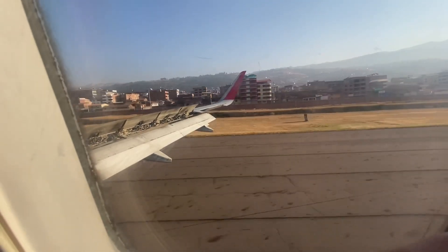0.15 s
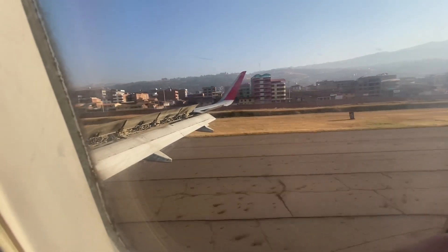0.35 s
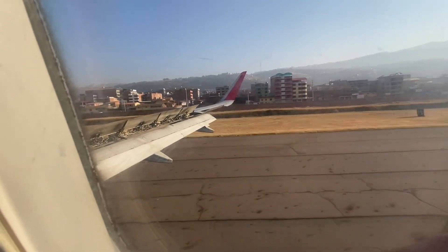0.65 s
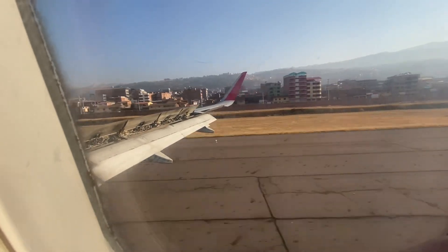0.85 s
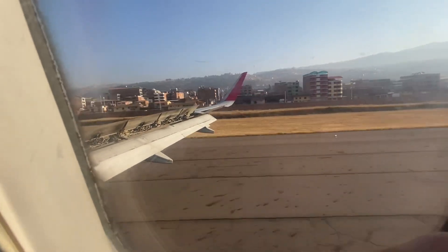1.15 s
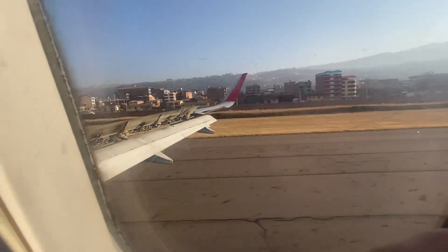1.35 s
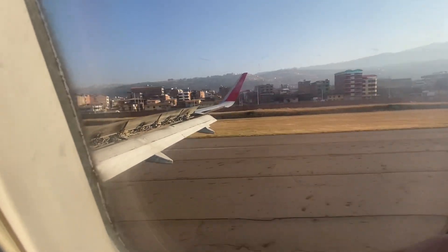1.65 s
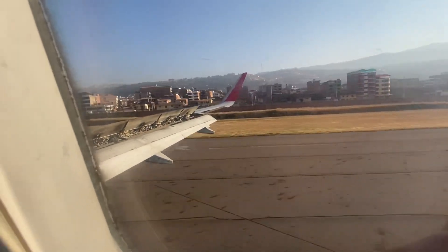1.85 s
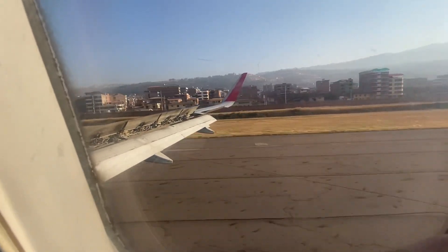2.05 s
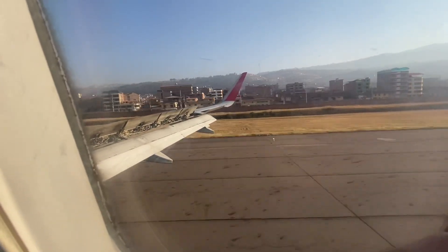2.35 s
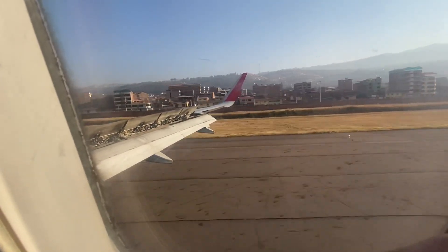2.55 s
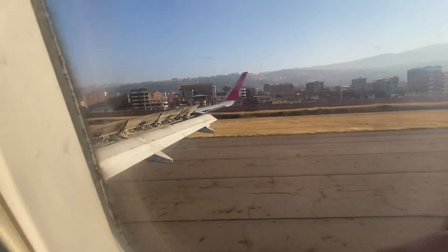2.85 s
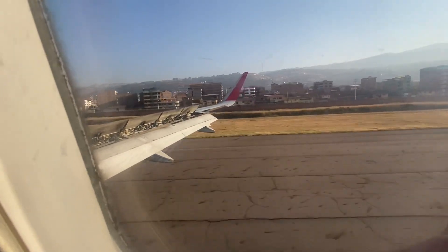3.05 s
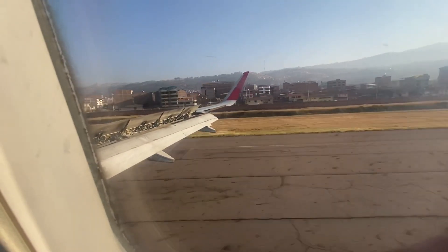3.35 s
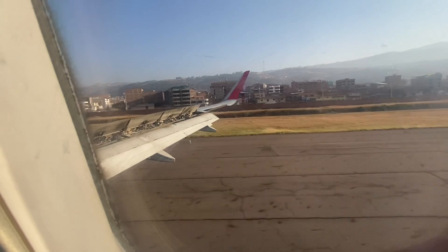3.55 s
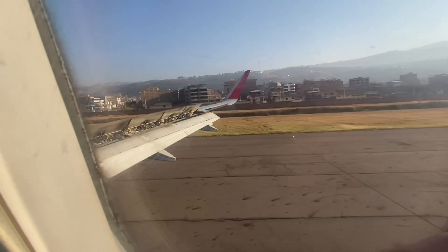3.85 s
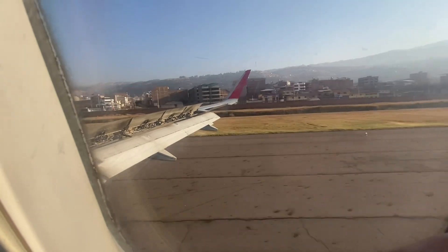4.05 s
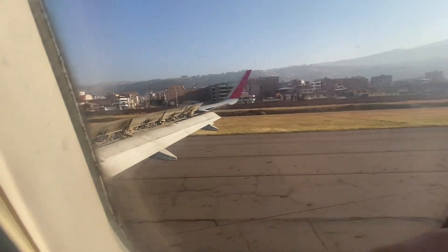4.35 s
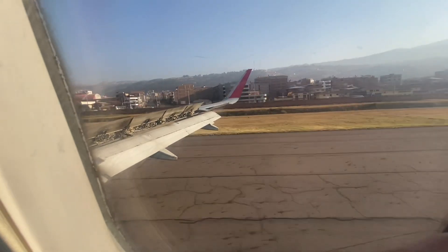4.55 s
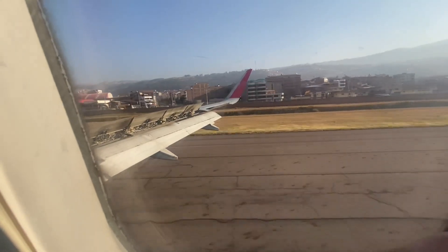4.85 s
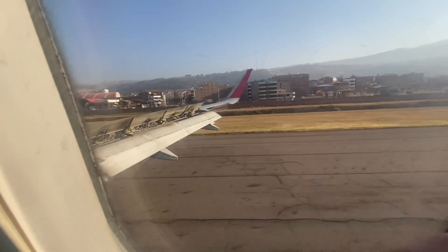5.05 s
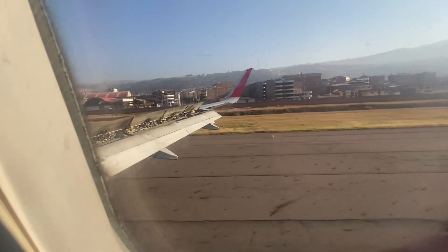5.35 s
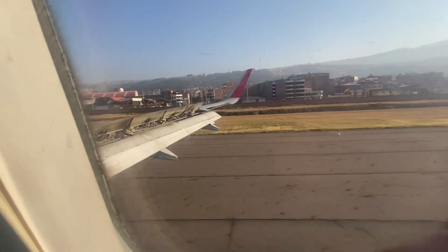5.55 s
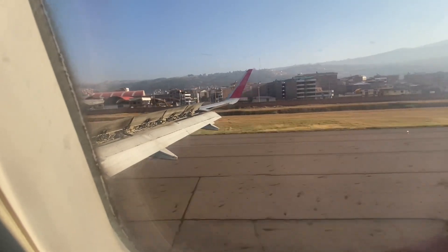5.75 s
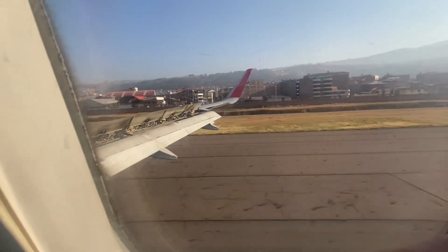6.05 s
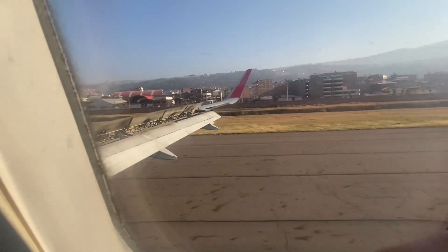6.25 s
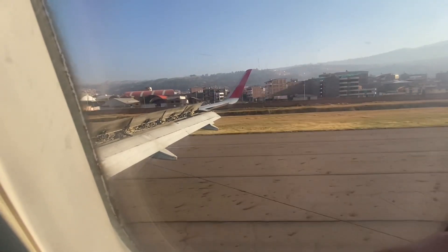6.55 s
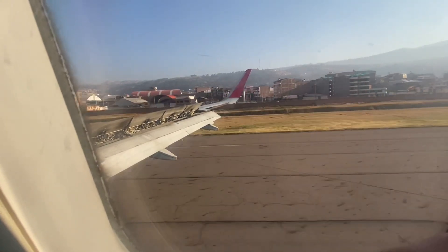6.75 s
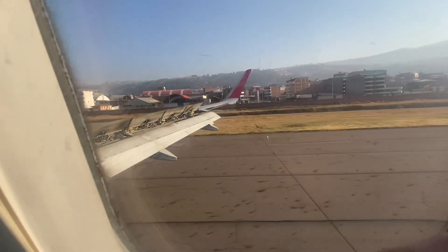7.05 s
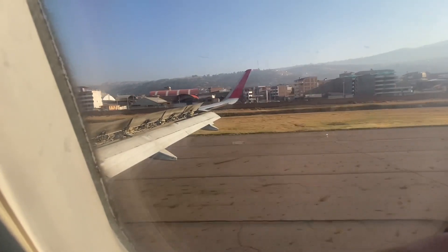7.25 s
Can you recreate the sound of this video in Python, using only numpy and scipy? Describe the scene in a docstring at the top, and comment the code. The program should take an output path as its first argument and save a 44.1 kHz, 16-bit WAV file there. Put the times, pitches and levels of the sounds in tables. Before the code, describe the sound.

Inside an airliner cabin beside a window during the landing roll, a loud, muffled reverse-thrust roar holds for two seconds, then sinks, faster at first and slower later. Deep wheel rumble and a throbbing fuselage boom lie beneath. Faint air hiss, tiny trim ticks and short buzzes become clearer, with the strongest rattles near the end. Close handheld stereo phone, bass squeezed by its limiter.

```python
"""Inside an airliner cabin, by a window, during the landing roll, heard at a phone's two microphone ports.
At first reverse thrust, shaped noise through the wall, is held over wheel rumble, a beating fuselage boom
near 50 Hz, vent hiss, a thin tone, and loose trim that buzzes and ticks in short bursts of noise.
From 2 s the roar sinks, from 4.7 s more slowly; the buzz sinks with it and the rumble fades all along.
The hiss dips in the middle and rises late; the strongest fits of rattling come after 6.4 s."""
import sys
import numpy as np
from scipy import signal
from scipy.fft import rfft, irfft
from scipy.io import wavfile
from scipy.ndimage import uniform_filter1d, minimum_filter1d

SR = 44100
rng = np.random.default_rng(int(sys.argv[2]) if len(sys.argv) > 2 else 0)


def transcribe(signal):
    """Save signal, clipped to [-1, 1], as a 16-bit WAV file at the path in sys.argv[1]."""
    frames = np.atleast_2d(signal).T
    limited = np.clip(frames, -1, 1)
    pcm = np.round(limited * 32767).astype(np.int16)
    wavfile.write(sys.argv[1], SR, pcm)


def field_ratio(decibels):
    """Amplitude ratio for a level in dB (20 dB per decade); scalars and array-likes work."""
    return 10 ** (np.asarray(decibels, dtype=float) / 20)


N = 325899
TIME = np.arange(N) / SR   # s
HZ = np.fft.rfftfreq(N, 1 / SR)


def thrust_sag_db():
    """Reverse thrust is held, then eased back: the roar sinks fast at first, later more slowly."""
    ease_back_s, near_idle_s = 2.034, 4.67
    ease_db_per_s, idle_db_per_s = 4, 2.5
    easing_s = np.clip(TIME, ease_back_s, near_idle_s) - ease_back_s
    idling_s = np.maximum(TIME - near_idle_s, 0)
    return -ease_db_per_s * easing_s - idle_db_per_s * idling_s


# spectrum of the roar through the cabin wall: (frequency [Hz], relative density [dB per Hz])
ROAR_COLOUR = [(35, -38), (60, 8), (76, -10.5), (154, -5.5), (214, -6), (340, -8.5), (428, -18), (481, -17),
               (654, -32.5), (735, -33), (1000, -39.5), (1170, -40.5), (1500, -48), (2000, -51),
               (6000, -76.5), (7800, -99), (13200, -120)]
# wall panels that the roar sets ringing: (frequency [Hz], width [Hz], height over the roar [dB])
WALL_PANELS = [(146, 41, 0), (154.7, 12, 9), (282.6, 39, 5), (348.7, 27, 4.5), (468, 45, 1.5),
               (724, 56, 4.5), (1161, 65, 6.5), (2070, 34, 4), (2800, 540, 2.5)]
# the roar surges and slackens as the aircraft rolls: (time [s], level over steady [dB])
ROAR_SURGE = [(0, 0.5), (.6, -0.2), (1.1, 0.5), (1.7, 0), (2.3, -0.1), (2.8, 0), (3.3, -0.1), (3.8, 0),
              (4.3, 0.5), (4.8, 0.4), (5.5, -0.6), (6.2, 0.5), (6.8, -0.1), (7.39, 0)]


def roar():
    """Reverse thrust as noise through the wall: it surges slowly, and its upper part flutters."""
    held_db, flutter_from_hz = -10.5, 560
    whole = noise_at_ports(ROAR_COLOUR, WALL_PANELS)
    upper = irfft(rfft(whole) / (1 + (flutter_from_hz / (HZ + 1)) ** 4), N)
    shaken = whole + upper * (flutter(per_s=14, depth_db=0.7) - 1)
    return field_ratio(held_db + thrust_sag_db()) * in_time(ROAR_SURGE) * shaken


# spectrum of the wheel rumble: (frequency [Hz], relative density [dB per Hz])
RUMBLE_COLOUR = [(25, -18.5), (31, -16), (37, -10), (42, -8), (50, -5.5), (60, -2), (100, -1), (160, -7.5),
                 (300, -22), (450, -44), (1000, -48), (1400, -60.5), (3000, -81)]
# floor resonances and one shallow dip:
# (frequency [Hz], width [Hz], height above or, if negative, below the rumble [dB])
FLOOR_SHAPE = [(64.5, 1.3, 5), (88, 7.3, 0.5), (264, 65, 4.5), (1026, 90, 2.5), (1190, 55, -1.5)]


def wheels():
    """Low rolling noise, humped and dipped by the floor; it sinks steadily as the aircraft slows."""
    start_db, slowing_db_per_s = -8, 1.215
    return field_ratio(start_db - slowing_db_per_s * TIME) * noise_at_ports(RUMBLE_COLOUR, FLOOR_SHAPE)


# the fuselage boom swells and sinks: (time [s], level [dB])
BOOM_LEVEL = [(.0, -17), (.2, -9), (.4, -15.5), (.8, -11.5), (1.05, -17.5), (1.4, -18), (1.6, -15),
              (2.15, -13), (2.55, -15), (2.9, -17), (3.15, -12.5), (3.5, -19), (3.7, -9.5), (4.05, -21.5),
              (4.3, -16), (4.8, -11.5), (5.05, -17.5), (5.4, -13), (5.8, -12.5), (6.05, -16.5),
              (6.5, -17.5), (6.8, -18.5), (6.95, -11.5), (7.15, -15), (7.39, -19)]
# it wavers in pitch, before rounding to whole turns: (time [s], frequency [Hz])
BOOM_WAVER = [(0.0, 49.1), (0.29, 52.2), (1.23, 51.4), (1.4, 54.1), (1.79, 49.2), (3.5, 51.5), (3.58, 55.9),
              (3.79, 50.8), (4.3, 49.6), (6.42, 51.5), (6.52, 55.9), (6.67, 49.2), (7.18, 49.1),
              (7.39, 55.9)]


def boom():
    """Noise in one narrow, wavering fuselage resonance, its random beats partly evened out."""
    width_hz, evenness, cut_hz = 3.0, 0.75, 120
    narrow = 1 / (1 + (2 * HZ / width_hz) ** 2)
    along, across = irfft(rfft(rng.standard_normal((2, 2, N))) * narrow, N)
    slow = (along + 1j * across) / np.std(along)
    turns = np.cumsum(np.interp(TIME, *np.transpose(BOOM_WAVER))) / SR
    phase = 2 * np.pi * turns * np.round(turns[-1]) / turns[-1]   # a whole number of turns
    beating = np.real(slow * np.exp(1j * phase))
    pair = beating / (abs(slow) + 0.2) ** evenness
    pair = irfft(rfft(pair) / (1 + (HZ / cut_hz) ** 4), N)
    return in_time(BOOM_LEVEL) * at_ports(*rms_one(pair))


# fits in which the trim rattles harder: (time [s], length [s], level over the steady buzz [dB])
RATTLE_FITS = [(.33, 0.043, 7.5), (.92, .08, 4), (1.01, .06, 4), (2.06, .1, 2), (2.699, 0.1, 5),
               (4.15, 0.16, 5), (4.998, 0.38, 2.6), (5.8, .12, 6), (6.5, 0.25, 8), (6.8, .11, 12),
               (6.96, .035, 7)]


def rattle_level():
    """The buzz follows the roar; each fit lifts it for a moment."""
    held_db, db_per_roar_db, edge_s = -60.5, 0.79, 0.015
    fits_db = 0
    for start, length, db in RATTLE_FITS:
        inside_s = np.minimum(TIME - start, start + length - TIME)
        fits_db = fits_db + db * np.clip(inside_s / edge_s + 0.5, 0, 1)
    return field_ratio(held_db + db_per_roar_db * thrust_sag_db() + fits_db)


def rattle():
    """Loose trim buzzes: dense small contacts at random times and of random strength."""
    contacts_per_s, mean_spread_db = 1500, 2.5   # the spread is capped at four times its mean setting
    strength = field_ratio(mean_spread_db * np.minimum(rng.exponential(1, N), 4))
    contacts = strength * (rng.random(N) < contacts_per_s / SR)
    return at_ports(*(flutter() * rattle_level() * rms_one(snaps(contacts))))


# single sharp ticks of the trim:
# (time [s], level over its loudest 2 ms [dB], centre frequency [Hz], width [octaves])
TRIM_TICKS = [ (.143, -55, 10000, 1.2), (.343, -46.5, 7000, 2.4), (.352, -55, 7500, 1.8),
              (.362, -56, 7000, 1.8), (.5, -52.5, 10500, .6), (.625, -55, 10500, .6),
              (.656, -46, 7000, 2.4), (.775, -56, 8000, 1.2), (.949, -54, 7500, 1.4),
              (.974, -51, 7000, 1.4), (1.022, -53, 7000, 1.4), (2.289, -54, 6800, .8),
              (2.649, -55, 10000, .8), (2.714, -54, 9000, 1.6), (2.722, -52, 7500, 2.2),
              (3.176, -54, 10600, .4), (3.219, -43, 6800, 2.0), (3.407, -54, 7900, .3),
              (3.465, -55, 10400, .4), (3.648, -53, 8500, 1.4), (3.826, -46, 7200, 2.2),
              (4.176, -53, 3500, .5), (4.271, -51, 6800, .7), (4.897, -42.5, 9000, 2.0),
              (4.996, -55, 7500, 1.2), (5.238, -58, 9000, 1.2), (5.294, -57.5, 10800, .4),
              (5.411, -48.5, 10500, 1.0), (5.432, -57, 7000, 1.0), (5.489, -46, 8000, 2.4),
              (5.495, -54, 8000, 2.0), (5.837, -55, 5600, 1.2), (5.993, -44, 7500, 2.0),
              (6.101, -57, 6000, 1.0), (6.895, -55, 5000, 1.8), (6.956, -42, 6500, 3.6),
              (6.963, -51, 5500, 1.8), (6.974, -59, 4500, 2.0), (6.984, -60, 5800, 1.2)]
# ringing of the panel behind the trim: (frequency [Hz], 60 dB decay time [s], level over the knock [dB])
KNOCKED_PANEL = [(1980, .02, 0), (2850, .008, -4)]


def ticks():
    """Each tick is a band of a fresh noise burst that bounces once and knocks the panel behind it."""
    knock_over_tick_db, bounce_s, bounce_db = -2, 0.014, -16
    contacts, knocks, clicks = np.zeros(N), np.zeros(N), np.zeros(N)
    size = round(0.012 * SR)   # samples in one tick
    contacts[:len(TRIM_TICKS) * 2 * size:2 * size] = 1
    bursts = snaps(contacts)[0]
    for k, (s, db, centre_hz, octaves) in enumerate(TRIM_TICKS):
        edges_hz = np.minimum(centre_hz * 2 ** (octaves * np.array([-0.5, 0.5])), 0.45 * SR)
        band = signal.butter(2, edges_hz, "band", fs=SR, output="sos")
        tick = signal.sosfilt(band, bursts[2 * k * size:(2 * k + 1) * size])
        loudest = np.sqrt(uniform_filter1d(tick ** 2, size=SR // 500).max())
        start = round(s * SR)
        clicks[start:start + size] += field_ratio(db) * tick / loudest
        knocks[start] = field_ratio(db + knock_over_tick_db)
    clicks += field_ratio(bounce_db) * np.roll(clicks, round(bounce_s * SR))
    ringing = sum(field_ratio(db) * ring(knocks, hz, t60) for hz, t60, db in KNOCKED_PANEL)
    return leaning(clicks) + ringing


# colour of a trim contact: (frequency [Hz], relative density [dB per Hz])
CONTACT_COLOUR = [(1200, -25), (2200, -5.5), (3600, -1.5), (4800, -1.5), (7500, -3.5), (9300, -10.5),
                  (11500, -8.5), (14000, -12.5), (16000, -18)]


def snaps(clicks):
    """Every contact is a noise burst that swells for a moment and dies in milliseconds."""
    rise_s, t60_s = 0.0008, 0.008
    rise, fall = np.exp(-1 / (rise_s * SR)), field_ratio(-60 / (t60_s * SR))
    dying = signal.lfilter([2 * (1 - rise)], np.convolve([1, -rise], [1, -fall]), clicks + 1e-18)
    colour = rms_one(field_ratio(at_hz(CONTACT_COLOUR, HZ)))
    return irfft(colour * rfft(dying * rng.standard_normal((2, N))), N)


def ring(clicks, hz, t60):
    """A unit click sets a decaying sine of starting height 1 ringing."""
    r, w = field_ratio(-60 / (t60 * SR)), 2 * np.pi * hz / SR
    return signal.lfilter([0, np.sin(w)], [1, -2 * r * np.cos(w), r * r], clicks + 1e-18)


# a tick leans to one side by pitch: (frequency [Hz], left minus right [dB])
TICK_BALANCE = [(2000, 1), (2800, 1.5), (4000, 7), (6300, 6.5), (8200, -6), (11000, -2), (14000, -1)]


def leaning(tick):
    """One close sound in both channels, louder left or right by pitch."""
    lean = field_ratio(at_hz(TICK_BALANCE, HZ))
    mid = rfft(at_ports(tick, 0 * tick).mean(axis=0))
    return irfft(2 * mid * np.array([lean, np.ones_like(lean)]) / (1 + lean), N)


# spectrum of the vent hiss: (frequency [Hz], relative density [dB per Hz])
HISS_COLOUR = [(900, -26), (1500, -2), (2100, 1), (3000, -2), (4200, -4.5), (5500, -8), (7200, -8.5),
               (9000, -13.5), (11500, -19.5), (16000, -43)]
# the hiss dips, then rises as the roar fades: (time [s], level over steady [dB])
HISS_SWELL = [(0, 0.5), (3.2, -1), (4.6, -1), (6.0, 0.5), (6.5, 1), (6.9, 1.5), (7.39, -0.5)]


def vents():
    """Air hiss: bright noise with one broad hump, fluttering and slowly swelling."""
    hump = (4100, 300, 2.5)   # (frequency [Hz], width [Hz], height [dB])
    return field_ratio(-59.5) * flutter() * in_time(HISS_SWELL) * noise_at_ports(HISS_COLOUR, [hump])


def tone():
    """A faint tone made of very narrow noise, so it wavers slowly; it comes out as the roar sinks."""
    tone_hz, width_hz, level_db = 1007, 3, -64
    narrow = 1 / (1 + (2 * (HZ - tone_hz) / width_hz) ** 2)
    pair = irfft(rfft(rng.standard_normal((2, N))) * narrow, N)
    return field_ratio(level_db) * at_ports(*rms_one(pair))


def noise_at_ports(colour, peaks=()):
    """Steady noise of one colour with humps or dips, scaled to unit rms before it is spread in stereo."""
    db = at_hz(colour, HZ)
    for peak_hz, width, top_db in peaks:
        db = db + top_db / (1 + (2 * (HZ - peak_hz) / width) ** 2)
    return at_ports(*rms_one(irfft(field_ratio(db) * rfft(rng.standard_normal((2, N))), N)))


# stereo spread, thinned in the treble above about 11 kHz: (frequency [Hz], difference over sum [dB])
STEREO_SPREAD = [(40, -24.5), (92, -14.5), (140, -10), (210, -6), (330, -11.5), (450, -0.5), (600, 9),
                 (830, 6), (930, 13.5), (1080, -2), (1200, 1), (1600, 6.5), (1900, 2), (2050, 4.5),
                 (2200, -0.5), (4200, 0.5), (9000, 0), (11000, -3), (12200, -16.5), (13000, -4),
                 (14500, -11.5)]
# part of the difference tied to the sum:
# (frequency [Hz], in phase = left louder [share], in quadrature = left earlier [share])
STEREO_COUPLING = [(60, 0.076, 0.3), (200, 0.12, 0.2), (330, .05, .1), (700, 0.18, .01), (2000, .1, .01),
                   (5000, 0.55, .01), (9000, .01, .01)]


def at_ports(near, diffuse):
    """Left and right from sum and difference; the difference is partly tied to the sum, partly its own."""
    hole_hz, hole_width_hz, hole_db = 13100, 1100, -35   # one hears a hole in the sum near 13 kHz
    in_phase = np.clip(at_hz(STEREO_COUPLING, HZ), -0.6, 0.6)
    quadrature = np.clip(at_hz(STEREO_COUPLING, HZ, axis=2), -0.75, 0.75)
    tie = in_phase + 1j * quadrature
    own = np.sqrt(1 - abs(tie) ** 2)
    side = field_ratio(at_hz(STEREO_SPREAD, HZ)) * (tie * rfft(near) + own * rfft(diffuse))
    mid = rfft(near) * field_ratio(hole_db / (1 + (2 * (HZ - hole_hz) / hole_width_hz) ** 6))
    return irfft(np.array([mid + side, mid - side]), N)


def flutter(per_s=8, depth_db=1.0):
    """A gain that wanders at random: slow noise with an rms depth in dB."""
    slow = irfft(rfft(rng.standard_normal(N)) / (1 + (HZ / per_s) ** 2), N)
    return field_ratio(depth_db * rms_one(slow))


def rms_one(x):
    """Scales to unit rms."""
    return x / np.sqrt(np.mean(x ** 2) + 1e-20)


def in_time(rows):
    """A level curve as gain per sample."""
    s, db = np.transpose(rows)
    return field_ratio(np.interp(TIME, s, db))


def at_hz(points, hz, axis=1):
    """Reads a table column on a log-frequency axis."""
    points = np.array(points, float)
    return np.interp(np.log(hz + 1), np.log(points[:, 0] + 1), points[:, axis])


def scene():
    """Roar, rumble, boom, rattle, ticks, hiss and tone add up in two channels."""
    return roar() + wheels() + boom() + rattle() + ticks() + vents() + tone()


def roll_off(x):
    """The treble ends steeply here."""
    return signal.sosfilt(signal.butter(12, 15820, fs=SR, output="sos"), x)


def record(dry):
    """A look-ahead limiter with a soft knee turns down the bass alone where the peaks run high."""
    limit, release_db_per_s, bass_below_hz, edge_fade_s = 0.89, 70.5, 460, 0.006
    low_pass = signal.butter(2, bass_below_hz, fs=SR, output="sos")
    bass = signal.sosfiltfilt(low_pass, dry, padlen=SR // 10)
    peak = abs(dry).max(axis=0) / limit
    over_db = 5 * np.log10(1 + peak ** 4)   # soft knee
    fall_db = release_db_per_s * TIME
    held_db = np.maximum.accumulate(over_db + fall_db) - fall_db
    # windows centred on each sample let the gain drop ahead of a peak
    gain = uniform_filter1d(minimum_filter1d(field_ratio(-held_db), size=131), size=131)
    to_end = np.minimum(np.arange(N), np.arange(N)[::-1])
    edge = np.clip(to_end / (edge_fade_s * SR), 0, 1)   # no click at either end
    mix = edge * (dry - bass * (1 - gain))
    return roll_off(mix)


dry = scene()
out = record(dry)
transcribe(out)
```